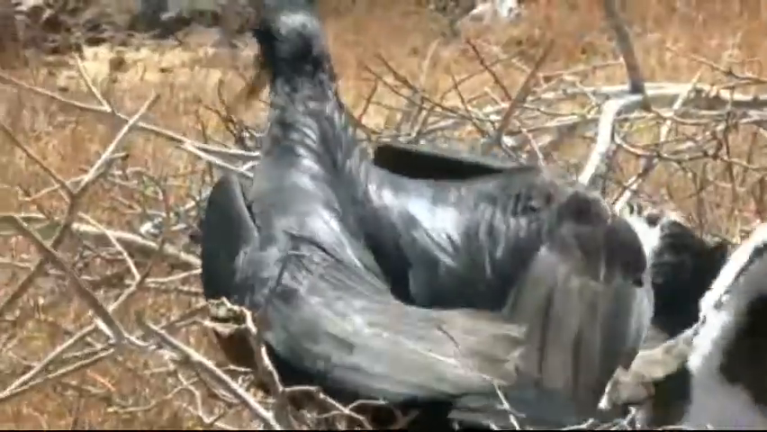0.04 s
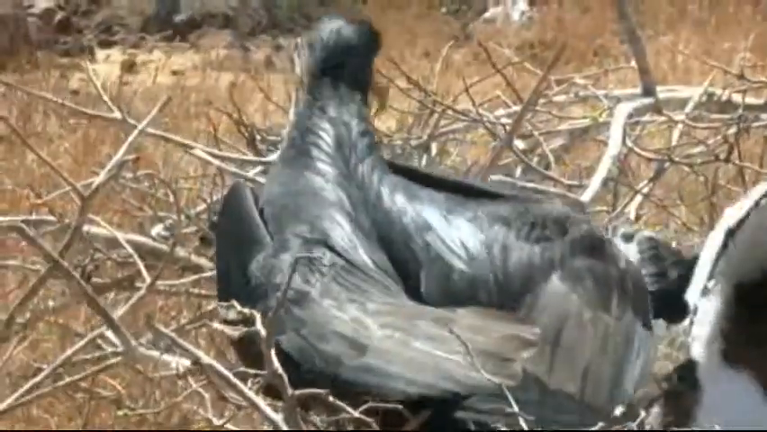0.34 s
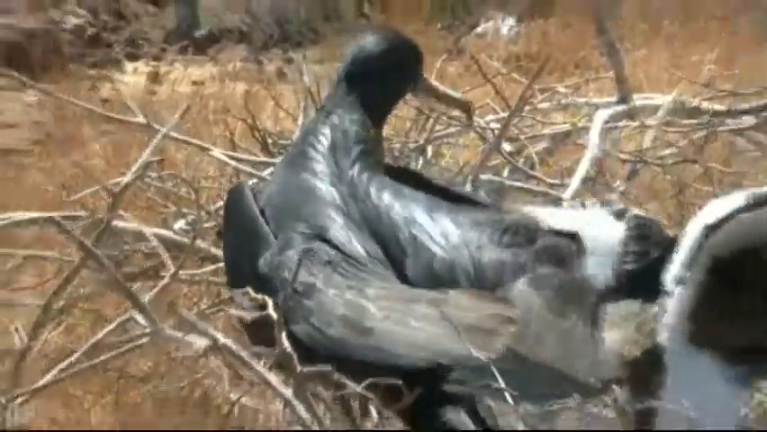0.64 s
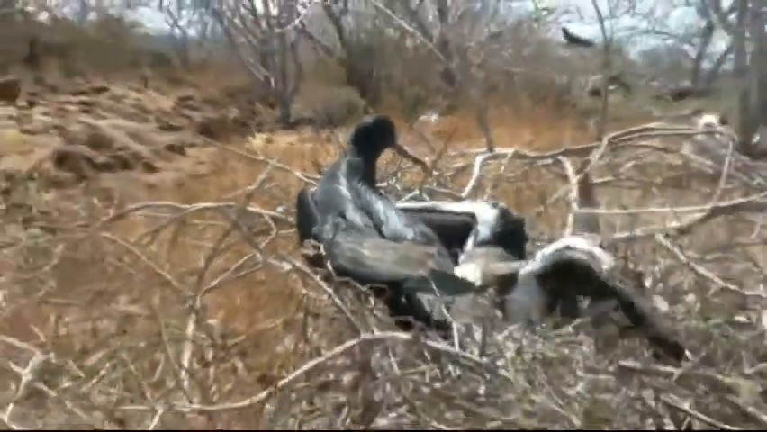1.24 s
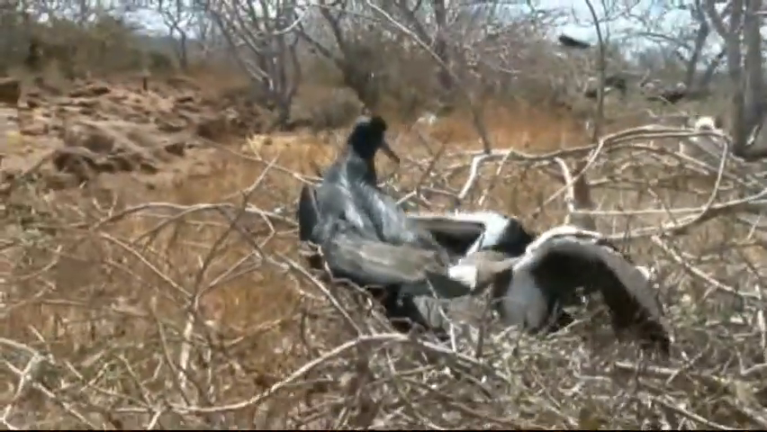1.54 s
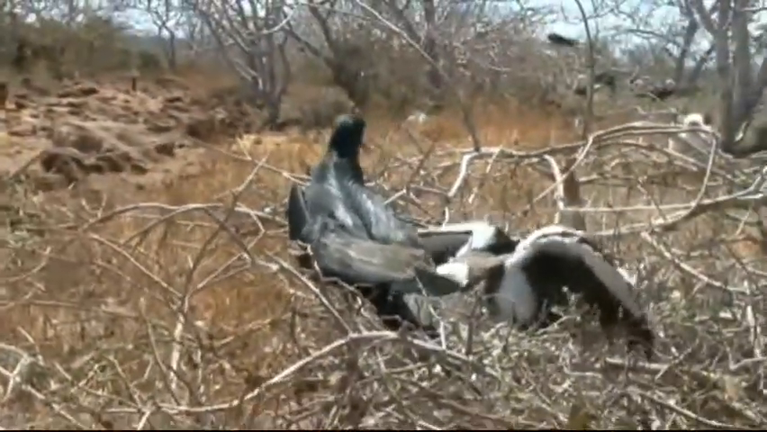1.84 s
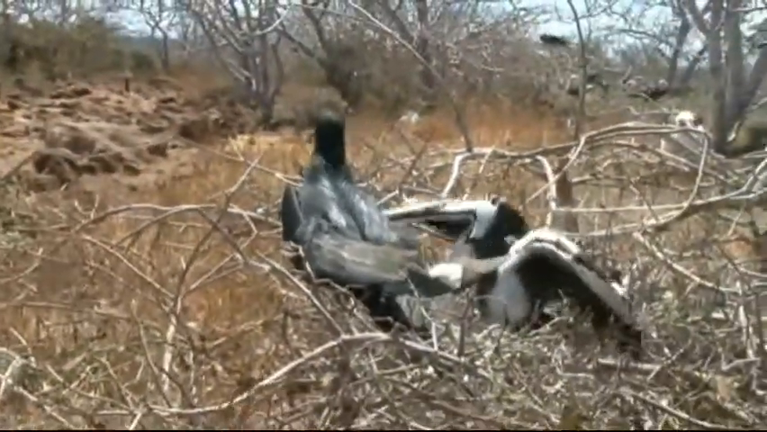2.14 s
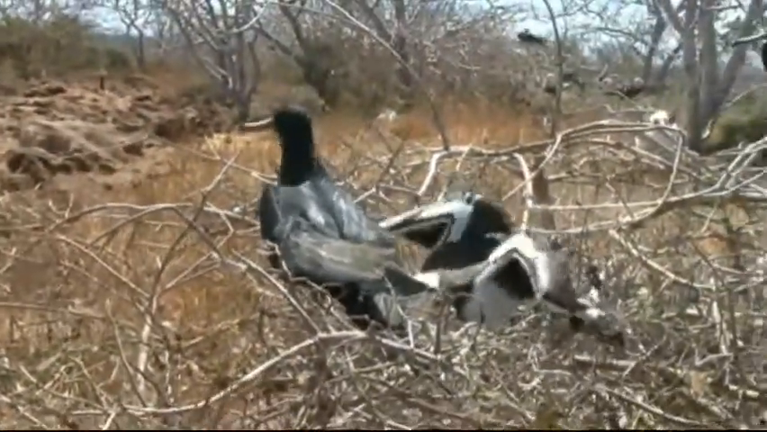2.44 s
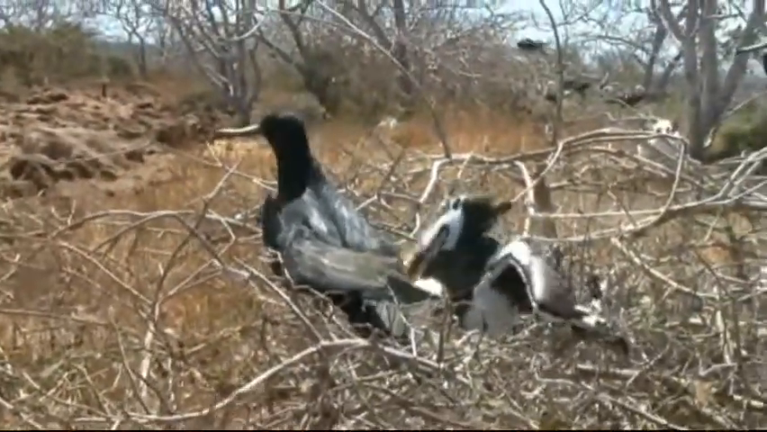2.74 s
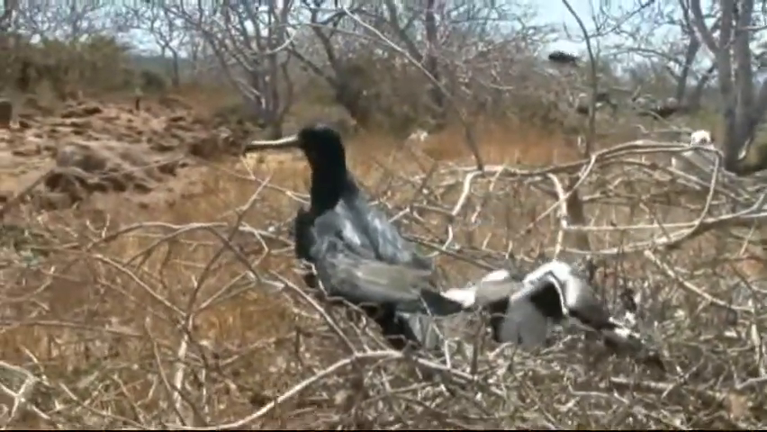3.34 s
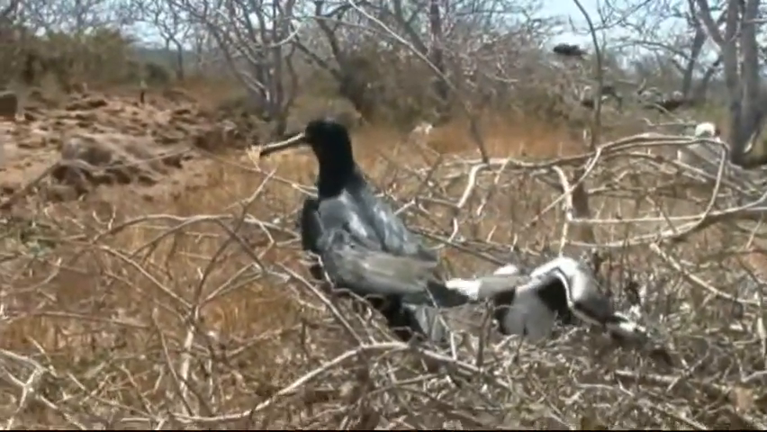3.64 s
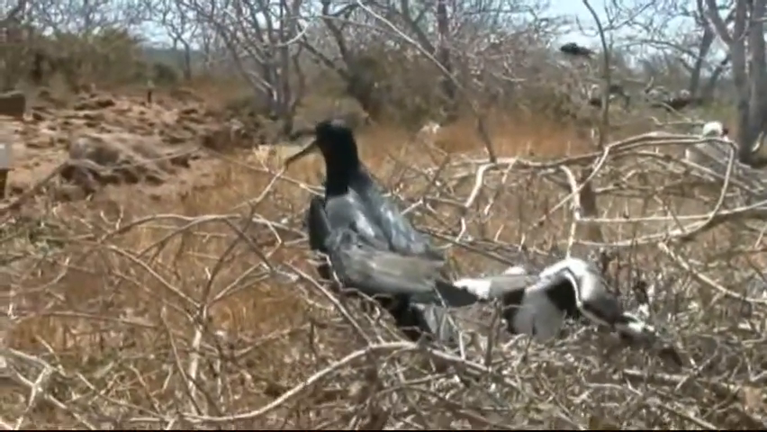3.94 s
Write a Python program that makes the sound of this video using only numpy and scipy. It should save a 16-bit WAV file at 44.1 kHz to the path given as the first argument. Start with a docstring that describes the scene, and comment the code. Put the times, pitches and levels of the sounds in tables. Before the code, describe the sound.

Harsh, raspy squeals come from a large bird nesting nearby in dry scrub. It calls, pauses briefly as twigs tick faintly, then calls again, each time climbing from a rasp to a wavering squeal. Wind gusts buffet the microphone.

```python
"""A large seabird begs on its nest in dry scrub, out in the wind.
Two long calls start as a growl, break into a rasp and rise to a quavering squeal.
The two sides of its voice box beat against each other when the pitch is low; twigs and ground
scatter the sound. Wind buffets the microphone, feathers brush the nest and a few dry twigs tick."""
import sys
import numpy as np
from scipy import signal
from scipy.fft import rfft, irfft
from scipy.io import wavfile
from scipy.ndimage import uniform_filter1d

SR = 44100
rng = np.random.default_rng(int(sys.argv[2]) if len(sys.argv) > 2 else 0)


def put_to_file(sound):
    """Save the sound as 16-bit audio at rate SR, in the file named by the first command-line argument."""
    columns = np.atleast_2d(sound).T  # one column per channel
    safe = np.clip(columns, -1, 1)
    whole_steps = np.round(safe * 32767)
    wavfile.write(sys.argv[1], SR, whole_steps.astype(np.int16))


N = 176400
EDGE_S = .007  # fade at each end of a note
LOCK_HZ, LOCK_SPACING_HZ = 2548, 594.7  # main throat resonance, and the step to its neighbours


def undb(db):
    """Decibels to gain."""
    return 10 ** (np.asarray(db) / 20)


def unit(x):
    """Scale to rms 1."""
    return x / np.sqrt(np.mean(x ** 2))


def walk(rate):
    """Smooth random wandering with rms 1, turning about `rate` times a second."""
    span = max(int(SR / rate), 2)
    return unit(uniform_filter1d(uniform_filter1d(rng.standard_normal(N), span), span))


def phase_of(hz):
    """Running phase in radians of a moving pitch."""
    return 2 * np.pi * np.cumsum(hz) / SR


def stereo_noise(spectrum, side_db):
    """Mid and side noise with a spectrum of (f/Hz, relative level/dB) points, as left and right."""
    hz, db = np.array(spectrum, float).T
    f = np.arange(N // 2 + 1) * SR / N
    gain = undb(np.interp(np.log(f + 1), np.log(hz), db))
    mid, side = (unit(irfft(rfft(rng.standard_normal(N)) * gain, N)) for _ in range(2))
    return mid + undb(side_db) * side * np.array([[1], [-1]])


def ring(x, modes):
    """Pass a sound through steep resonances (f/Hz, width/Hz, relative level/dB); rms 1 comes out."""
    f = np.arange(1, N // 2 + 2) * SR / N
    power = sum(undb(db) ** 2 / (1 + ((f * f - hz * hz) / (f * width)) ** 2) ** 3
                for hz, width, db in modes)
    return unit(irfft(rfft(x) * np.sqrt(power), N))


def gate(t, start, end):
    """On between two times, with short edges."""
    return np.sin(np.pi / 2 * np.clip(np.minimum(t - start, end - t) / EDGE_S + .5, 0, 1))


def wind(t):
    """Rumble and sharper gusts on the microphone, over the steady hiss of the scrub around it."""
    # spectra of the three noises: f/Hz, relative level/dB
    rumble_spectrum = [(12, -4.5), (35, 3), (60, 2), (130, 0.5), (200, -11.5), (400, -46), (4000, -100)]
    buffet_spectrum = [(90, -13), (180, -1.5), (300, -5.5), (500, -9), (750, -15.5), (1100, -24.5),
                       (2000, -33.5), (15000, -72)]
    scrub_spectrum = [(100, 0), (600, -3), (1500, -8), (3000, -14), (5000, -19), (9000, -28), (12000, -37),
                      (15500, -45)]
    # strength of the breeze at the microphone: t/s, level/dB
    breeze_curve = [(0, -36), (.13, -25), (.18, -23.5), (.30, -26), (.43, -35.5), (.53, -29), (.62, -37.5),
                    (.72, -33), (1.05, -39.5), (1.17, -47), (1.26, -42), (1.36, -46.5), (1.65, -39),
                    (1.76, -30.5), (1.9, -28.5), (2.3, -33), (2.55, -29), (2.8, -38.5), (3.0, -34.5),
                    (3.3, -31), (3.65, -43.5), (4.0, -42.5)]
    # gusts that hit the microphone: t/s, width/s, relative level/dB
    gust_hits = [(0.025, 0.04, -31.5), (0.115, 0.062, -27.5), (0.198, 0.069, -25), (0.244, 0.0062, -24),
                 (0.289, 0.044, -21.5), (0.533, 0.078, -27.5), (0.715, 0.0095, -26.5), (0.828, 0.015, -29),
                 (1.019, 0.028, -30), (1.258, 0.012, -36.5), (1.745, 0.041, -20.5), (1.993, 0.073, -31.5),
                 (2.192, 0.041, -28), (2.264, 0.021, -28), (2.307, 0.019, -25.5), (2.363, 0.044, -29.5),
                 (2.487, 0.037, -22.5), (2.551, 0.0086, -19.5), (3.32, 0.043, -36), (3.395, 0.035, -32.5),
                 (3.477, 0.035, -31.5)]
    breeze = undb(np.interp(t, *np.array(breeze_curve).T))
    gusts = sum(undb(db - 1) * np.exp(-2.2 * ((t - at) / width) ** 2) for at, width, db in gust_hits)
    rumble = stereo_noise(rumble_spectrum, side_db=-23) * breeze * undb(1 + 3.7 * walk(30.4))
    buffet = stereo_noise(buffet_spectrum, side_db=-10) * np.hypot(gusts, breeze * undb(-8.5))
    eddies = undb(3 * walk(130))
    hiss = stereo_noise(scrub_spectrum, side_db=-11) * undb(-45.5 + walk(6))
    return rumble + buffet * eddies + hiss


def feathers(t):
    """Feathers brush over the sticks of the nest: a brief, faint hiss."""
    return gate(t, -.02, .16) * undb(-51.5) * ring(rng.standard_normal(N), [(6000, 5500, 0)])


def growls(t):
    """Slow uneven pulses and a little breath ring the bird's half-open throat."""
    # growls: start t/s, end t/s, start f/Hz, end f/Hz, level/dB
    growl_notes = [(.452, 0.497, 647, 663, -35.5), (0.491, 0.534, 718, 561, -33.5),
                   (2.136, 2.159, 675, 552, -38), (2.939, 2.99, 756, 594, -32),
                   (2.991, 3.024, 745, 646.6, -27.5)]
    # resonances of the half-open throat: f/Hz, width/Hz, relative level/dB
    open_throat = [(640, 360, -5), (1330, 2600, -1), (2380, 650, 7), (2920, 470, 0.5), (3800, 990, -5.5),
                   (4990, 800, -2.5), (6640, 900, -17.5), (9150, 4800, -26)]
    hz, loud = np.full(N, 650.), 0
    for start, end, start_hz, end_hz, db in growl_notes:
        on = gate(t, start, end)
        hz = hz + on * (np.interp(t, [start, end], [start_hz, end_hz]) - hz)
        loud = np.hypot(loud, on * undb(db))
    phase = phase_of(hz * (1 + .04 * walk(800) + .035 * walk(70)))
    pulses = unit(sum(np.cos(k * phase) for k in range(1, 18))) * undb(2.5 * walk(600))
    breath = .25 * rng.standard_normal(N)
    return loud * ring(pulses + breath, open_throat)


def syrinx(hz, rough, throat, *, jitter, smear, second_hz, second_db, beat_db, mirror_db,
           buzz_db, octave_db, third_db, air_db, rattle_db):
    """Two membranes: roughness shakes the first and wakes the second, which beats against it."""
    jitter_rate, flutter_rate, rattle_hz, bright_db_per_octave = 1100, 224, 125, 26
    one = phase_of(hz * (1 + jitter * rough * walk(jitter_rate) + .016 * np.sqrt(rough) * walk(110)))
    two = phase_of(second_hz * (1 + .03 * walk(jitter_rate) + .016 * walk(70)))
    smeared = one + smear * np.sqrt(rough) * .31 * walk(570)
    overtones = undb(octave_db) * np.cos(2 * smeared)
    overtones += undb(third_db) * (np.sin(3 * smeared) + .16 * np.cos(4 * smeared))
    beat = np.cos(two - one)  # heard as an undertone
    mirrored_sideband = ring(np.sin(2 * one - two), throat)
    second = undb(second_db) * np.sin(two) + undb(beat_db) * beat + undb(mirror_db) * mirrored_sideband
    # a slap on every third cycle and pulsed turbulence ring the throat
    buzz = ring(sum(np.cos(k * smeared / 3) for k in range(1, 18)), throat)
    air = ring(rng.standard_normal(N) * (1 + np.cos(one)) * (1 + .5 * beat), throat)
    bright_db = 2 * walk(150) + bright_db_per_octave * np.maximum(np.log2(hz / LOCK_HZ), 0)
    tone = np.sin(one) + overtones / (1 + rough) * undb(bright_db)
    rattle = np.sin(phase_of(rattle_hz * (1 + .35 * walk(flutter_rate))))
    voice = tone + rough * (second + undb(buzz_db) * buzz + undb(air_db) * air)
    power = uniform_filter1d(voice ** 2, size=32)
    voice *= (uniform_filter1d(power, size=600) / power) ** .25  # the membranes can swing only so far
    return voice * undb(rough * (rattle_db * rattle + 1.5 * walk(flutter_rate)))


def calls(t):
    """Low raspy notes, then squeals that slip between throat resonances and rasp on downward swings."""
    # low notes: start t/s, end t/s, start f/Hz, end f/Hz, level/dB, roughness (0 is pure)
    low_notes = [(0.537, .560, 1930, 1680, -28, 0.09), (0.556, 0.592, 1900, 1800, -32, 1.36),
                 (0.632, 0.652, 1830, 1780, -23.5, 0.07), (.651, 0.729, 1810, 1860, -27, 1),
                 (0.735, 0.78, 1860, 1850, -29, 1.09), (0.782, .804, 2480, 2350, -27.5, 0.3),
                 (0.804, 0.898, 1830, 1890, -26.5, 0.98), (0.9, 0.979, 1890, 1930, -22.5, 0.67),
                 (2.114, 2.134, 1950, 1700, -27, 0.54), (3.06, 3.094, 1840, 1760, -25.5, 0.08),
                 (3.093, 3.187, 1800, 1870, -26.5, 0.73), (3.198, 3.25, 1890, 1850, -25.5, 0.7),
                 (3.29, 3.312, 2410, 2350, -30, 0.07), (3.314, 3.344, 1960, 1890, -20.5, 0.51),
                 (3.346, 3.420, 1880, 1890, -27, .85), (3.433, 3.458, 1870, 1900, -26, 0.68),
                 (3.517, 3.582, 1960, 1900, -25.5, 0.73)]
    # squeals: start t/s, end t/s
    squeal_spans = [(0.976, 2.11), (3.457, 4.02)]
    # effort in the squeals: t/s, resting f/Hz, level/dB, roughness 0-1
    effort = [(.975, 2552, -22.5, 0.92), (1.071, 2539, -18.5, 0.54), (1.116, 2580, -13.5, 0.2),
              (1.17, 2491, -16.5, .42), (1.203, 2458, -13, 0.22), (1.235, 2400, -8, 0),
              (1.253, 2503, -16.5, 0.41), (1.35, 2494, -18, 0.75), (1.409, 2628, -15.5, 0.5),
              (1.551, 2550, -16.5, 0.65), (1.66, 2519, -21, 0.84), (1.69, 2570, -13.5, 0.43),
              (1.80, 2651, -15.5, 0.47), (1.88, 2623, -13, 0.44), (1.999, 2552, -16.5, 0.44),
              (2.07, 2640, -17, 0.49), (2.109, 2586, -23, 0.48), (3.46, 2459, -24, 0.4),
              (3.62, 2550, -22, 0.55), (3.69, 2384, -17, 0.24), (3.74, 2514, -19, 0.55),
              (3.775, 2509, -15, 0.21), (3.851, 2477, -17, 0.43), (3.93, 2540, -21, 0.7),
              (3.97, 2578, -17.5, 0.35), (4.0, 2596, -21, 0.62)]
    # brief swings of the squeal's pitch: t/s, length/s, target f/Hz
    quavers = [(1.165, .012, 2950), (1.186, .021, 1930), (1.218, .009, 2900), (1.244, .009, 2950),
               (1.257, .009, 1950), (1.293, .008, 2850), (1.309, .01, 1920), (1.337, .018, 1900),
               (1.429, .014, 2980), (1.456, .012, 2870), (1.479, .016, 3080), (1.506, .02, 3140),
               (1.533, .02, 3080), (1.566, .016, 2930), (1.606, .018, 1980), (1.682, .022, 3240),
               (1.703, .008, 1960), (1.72, .019, 3200), (1.738, .008, 1950), (1.756, .013, 3110),
               (1.784, .021, 3120), (1.821, .037, 3120), (1.86, .02, 3200), (1.89, .022, 3200),
               (1.919, .017, 3170), (1.943, .018, 3090), (1.972, .014, 3100), (2.012, .012, 2950),
               (2.046, .016, 3060), (2.07, .016, 3150), (2.089, .017, 1900), (3.463, .018, 2000),
               (3.487, .01, 2120), (3.499, .022, 2950), (3.589, .016, 3230), (3.606, .018, 1870),
               (3.638, .018, 1830), (3.653, .014, 3030), (3.671, .016, 1880), (3.703, .01, 2020),
               (3.713, .013, 3100), (3.729, .016, 1870), (3.752, .031, 3030), (3.794, .015, 3020),
               (3.811, .005, 2250), (3.831, .013, 2750), (3.862, .01, 2850), (3.881, .02, 1980),
               (3.897, .011, 3070), (3.947, .012, 2980), (3.994, .022, 3020)]
    # throat resonances: f/Hz, width/Hz, relative level/dB in a rasp, relative level/dB in a squeal
    throat_modes = [(781, 117, -8, -31), (1584, 550, -22.5, -18.5), (1940, 284, 2, 1.5),
                    (2484, 720, 2.5, 5), (2910, 400, -1, -1.5), (3230, 72, -0.5, -6), (3648, 300, -2, -14),
                    (4260, 410, -10, -16), (4790, 380, -4, -8), (5523, 820, -9, -4.5),
                    (6390, 190, -9.5, -16), (7100, 1100, -19.5, -20.5), (8840, 1060, -21.5, -21.5),
                    (10030, 2000, -28, -26), (13300, 7100, -42, -44)]
    lock_pull, slip_db, off_tune_db_per_octave = .42, -6.5, -10.5
    break_hz, break_width_hz = 2134, 260

    when, resting_hz, effort_db, effort_rough = np.array(effort).T
    hz = np.interp(t, when, resting_hz)
    for at, length, target_hz in quavers:
        swing = np.exp(-np.abs((t - at) / (length / 2)) ** 4)
        hz = hz + swing * (target_hz - hz)
    # the pitch clings to evenly spaced resonances; the squeal weakens between them and above the main one
    detune = 2 * np.pi * (hz - LOCK_HZ) / LOCK_SPACING_HZ
    hz = hz - lock_pull * LOCK_SPACING_HZ * np.sin(detune) / (2 * np.pi)
    slip = np.sin(detune / 2) ** 2
    off_tune_db = off_tune_db_per_octave * np.maximum(np.log2(hz / LOCK_HZ), 0) + slip_db * slip ** 2
    squealing = sum(gate(t, start, end) for start, end in squeal_spans)
    loud = undb(np.interp(t, when, effort_db) + off_tune_db) * squealing
    squeal_rough = np.hypot(np.interp(t, when, effort_rough), slip / 2)

    broken = np.clip((break_hz - hz) / break_width_hz, 0, 1)  # a squeal that falls low turns to rasp
    rasp_gain = loud * np.sqrt(broken) * undb(-4.5)
    rasp_rough = np.full(N, .85)
    for start, end, start_hz, end_hz, db, rough in low_notes:
        on = gate(t, start, end)
        pitch_held = gate(t, start - EDGE_S / 2, end + EDGE_S / 2)
        hz = hz + pitch_held * (np.interp(t, [start, end], [start_hz, end_hz]) - hz)
        rasp_rough = rasp_rough + on * (rough - rasp_rough)
        rasp_gain = np.hypot(rasp_gain, on * undb(db))

    throat = np.array(throat_modes, float)
    rasp = syrinx(hz, rasp_rough, throat[:, [0, 1, 2]], jitter=.04, smear=1.3,
                  second_hz=2600, second_db=-5, beat_db=-15, mirror_db=-30,
                  buzz_db=-6, octave_db=-10.5, third_db=-20, air_db=-4.5, rattle_db=2.5)
    squeal = syrinx(hz, squeal_rough, throat[:, [0, 1, 3]], jitter=.032, smear=2,
                    second_hz=2070, second_db=-13, beat_db=-36, mirror_db=-9,
                    buzz_db=-20, octave_db=-20.5, third_db=-37, air_db=-6, rattle_db=2)
    return rasp_gain * rasp + loud * np.sqrt(1 - broken) * squeal


def twigs(t):
    """Dry sticks knock together and ring briefly."""
    # twig ticks: t/s, level/dB, ring f/Hz, t60/s
    ticks = [(0.691, -38, 7800, 0.041), (1.2773, -32.5, 8863, 0.013), (2.415, -32, 1700, 0.1),
             (2.463, -31.5, 1900, 0.012), (2.641, -32.5, 2060, 0.026), (2.731, -32, 1840, 0.023)]
    out = np.zeros(N)
    for at, db, hz, t60 in ticks:
        wood = ring(rng.standard_normal(N), [(hz, .5 * hz, 0), (4500, 6000, -18)])
        out += wood * (t >= at) * undb(db - 60 * np.abs(t - at) / t60)
    return out


def scrub_scatter(t, sound, t60_s):
    """Twigs and ground scatter a sound into a short tail, different on the left and right."""
    tail = rng.standard_normal((2, N // 8)) * undb(-60 * t[:N // 8] / t60_s)
    tail /= np.sqrt(np.sum(tail ** 2, axis=1, keepdims=True))
    return signal.fftconvolve(sound[None], tail, axes=1)[:, :N]


def scene():
    """The nest almost straight ahead of a stereo microphone, near enough for direct sound to lead."""
    t = np.arange(N) / SR
    nest = calls(t) + growls(t) + feathers(t) + twigs(t)
    scatter = undb(-12) * scrub_scatter(t, nest, t60_s=.1)
    pan = undb([[.15], [-.15]])
    return (nest + scatter) * pan + wind(t)


def record(dry):
    """The camera's sound input cuts the top steeply."""
    top_hz = 15400
    return signal.sosfilt(signal.ellip(10, .2, 80, top_hz, fs=SR, output="sos"), dry)


dry = scene()
out = record(dry)
put_to_file(out)
```